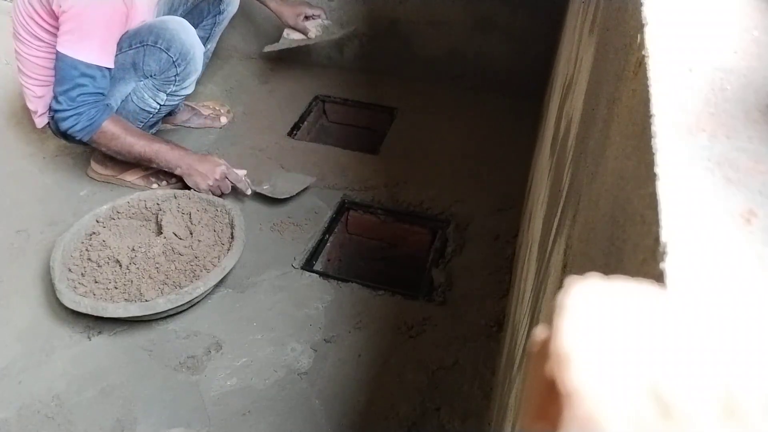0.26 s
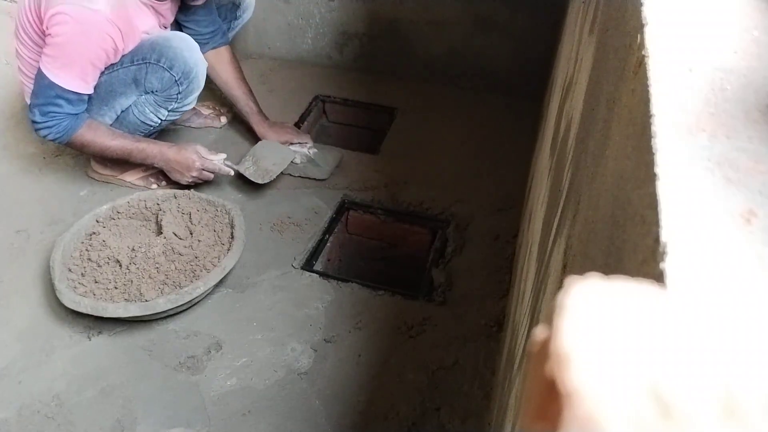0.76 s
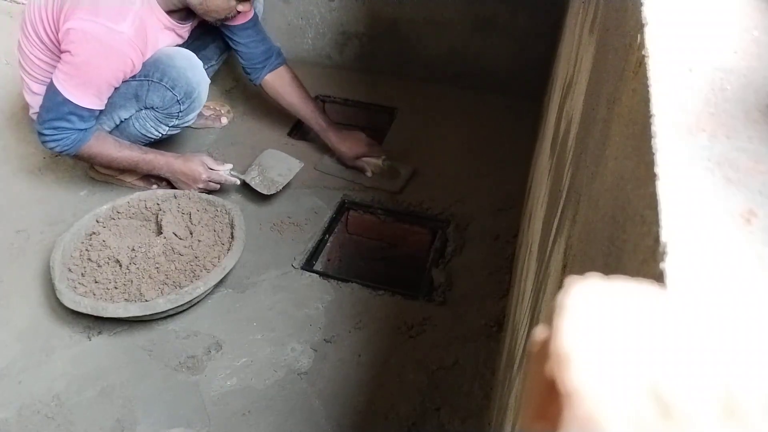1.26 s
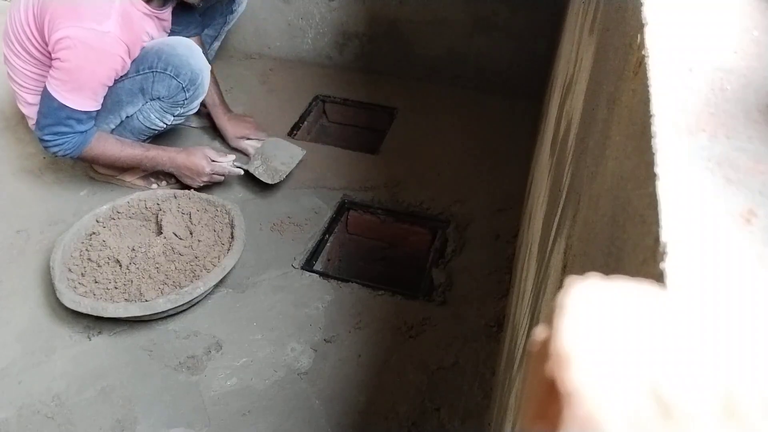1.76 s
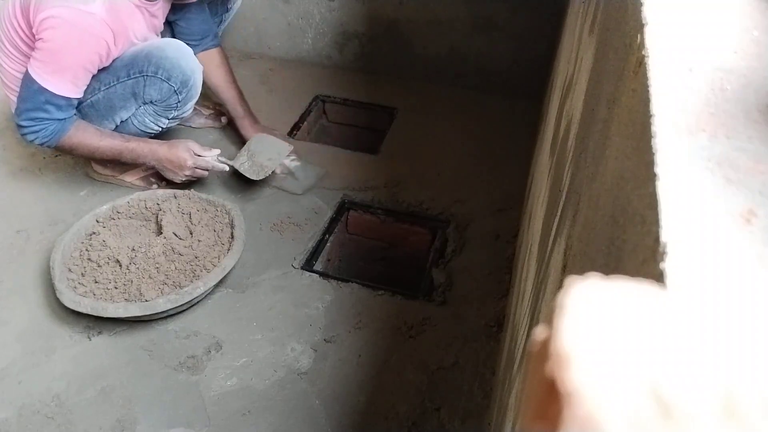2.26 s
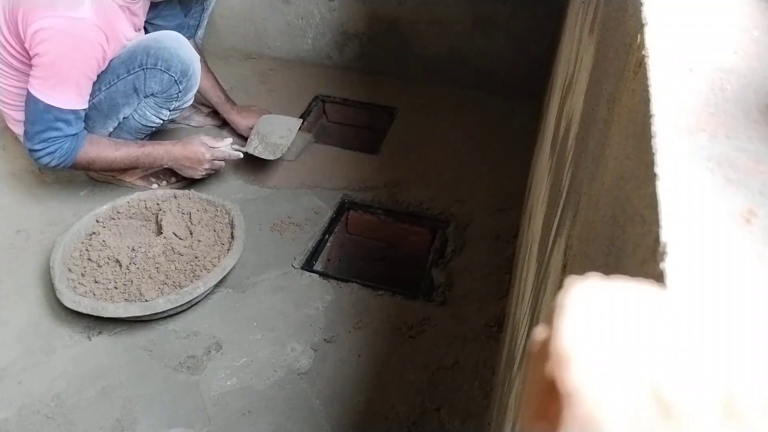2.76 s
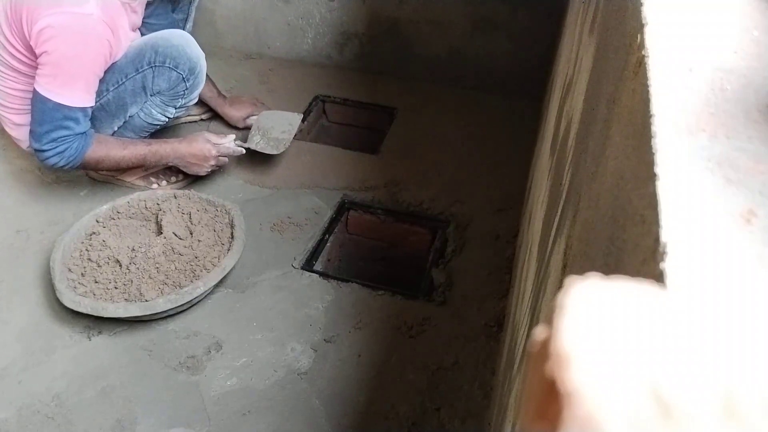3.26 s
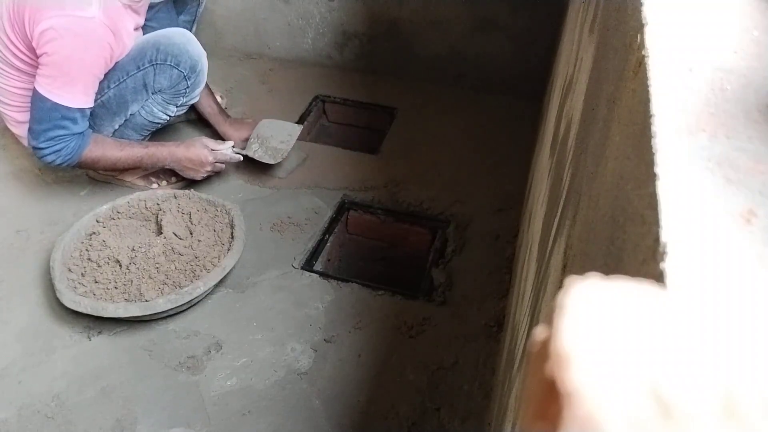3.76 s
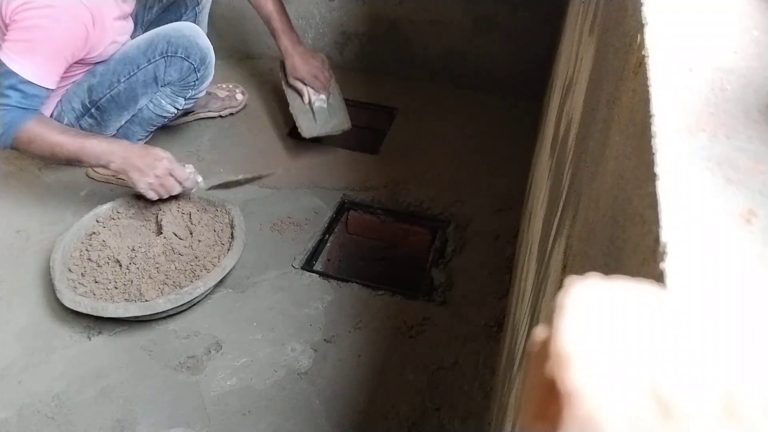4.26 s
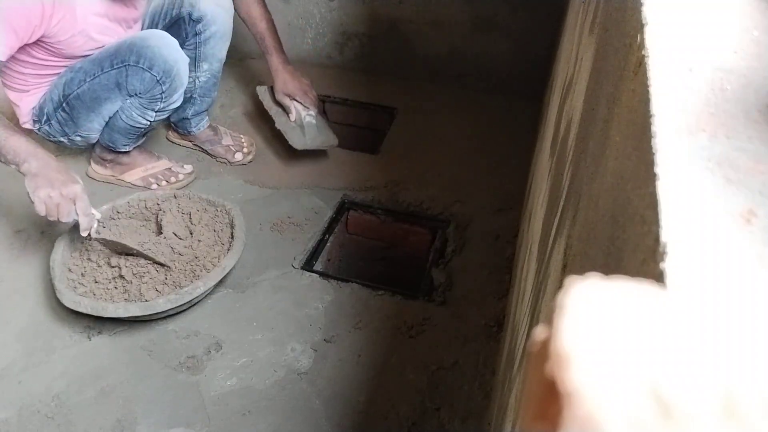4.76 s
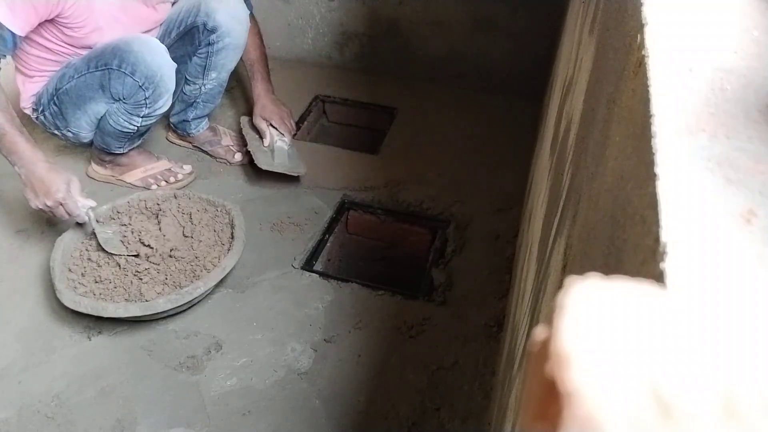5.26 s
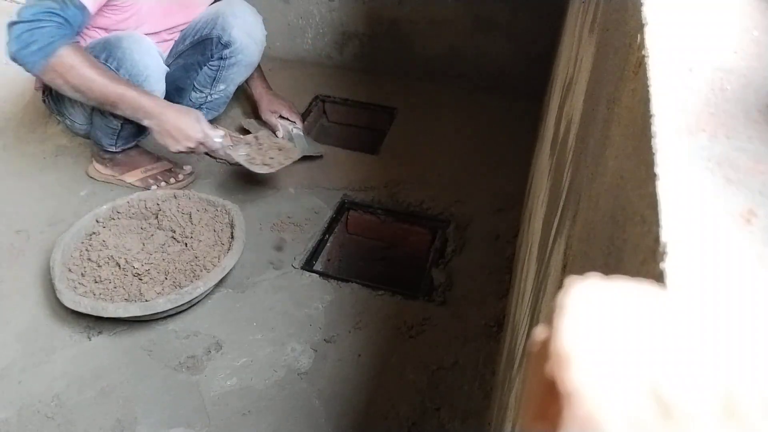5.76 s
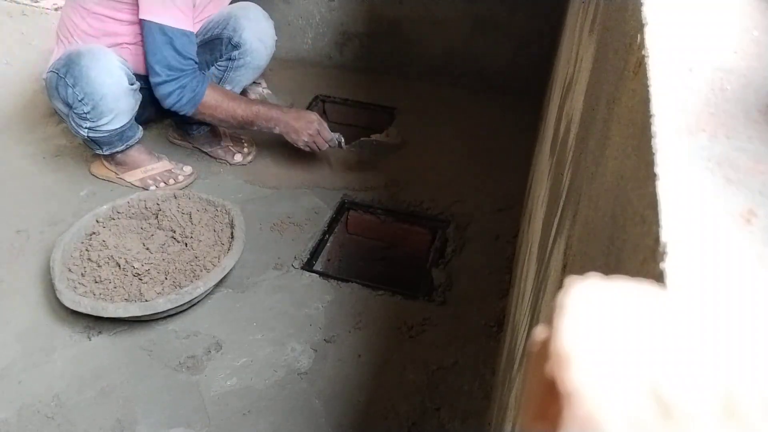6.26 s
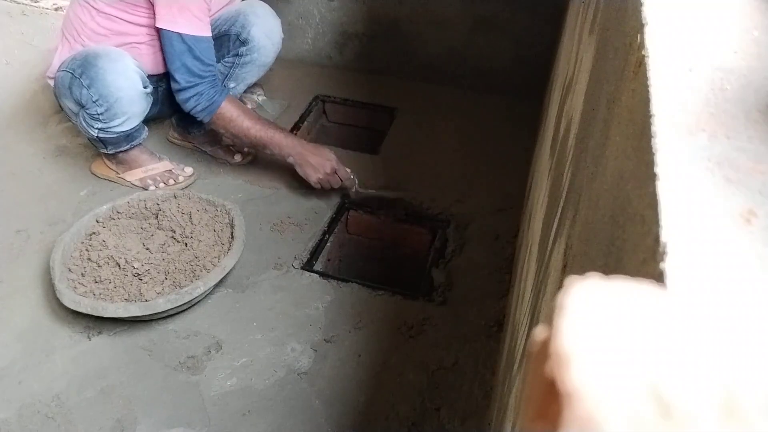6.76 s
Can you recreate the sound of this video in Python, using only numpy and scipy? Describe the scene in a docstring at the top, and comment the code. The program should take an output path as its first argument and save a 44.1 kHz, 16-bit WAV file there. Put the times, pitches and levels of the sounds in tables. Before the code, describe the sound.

Sandy rubbing and hissing strokes over mortar, with small metallic tings, give way to slow ringing hammer strikes reverberating between hard walls.

```python
"""In a bare concrete room a mason smooths wet mortar with a hand float and a steel trowel.
Enveloped noise and sand-grain impulses make each stroke rub, grind and hiss; stones make the trowel sing.
From half way on, heavy, even hammer blows fall out of sight, probably on a chisel in masonry:
coloured echoes clang, thud and ring on between hard walls. Soft bumps are narrow bands of noise,
and a low site rumble of shaped noise lies under it all."""
import sys
import numpy as np
from scipy import signal
from scipy.fft import rfft, irfft, next_fast_len
from scipy.io import wavfile
from scipy.ndimage import uniform_filter1d, map_coordinates

SR = 44100
rng = np.random.default_rng(int(sys.argv[2]) if len(sys.argv) > 2 else 0)


def pcm_store(signal):
    """Save signal as 16-bit PCM."""
    levels = np.round(np.clip(np.atleast_2d(signal), -1, 1) * 32767)
    wavfile.write(sys.argv[1], SR, levels.astype(np.int16).T)


N = 309141  # length in samples, about 7 s


def amp(db):
    """Turn decibels into an amplitude factor."""
    return 10 ** (np.asarray(db) / 20)


def unit(x):
    """Scale to rms 1."""
    return x / np.sqrt(np.mean(x ** 2) + 1e-20)


def along(points, hz):
    """Read a (frequency, value) curve on a log frequency axis."""
    f, v = np.transpose(points)
    return np.interp(np.log(hz + 1), np.log(f + 1), v)


def wobble(rate):
    """A smooth random curve with rate random knots a second."""
    knots = rng.standard_normal(int(N * rate / SR) + 4)
    return map_coordinates(knots, [np.arange(N) * rate / SR])


def add(track, s, sound):
    """Mix a stereo sound into the track at time s."""
    part = track[:, round(s * SR):][:, :sound.shape[1]]
    part += sound[:, :part.shape[1]]


# how alike left and right are: (frequency [Hz], likeness [0-1])
ALIKE = [(100, .95), (250, .87), (500, .73), (1100, .66), (2000, .46), (4000, .33), (9000, .12)]
# phase by which the left leads, negative where the right leads: (frequency [Hz], lead [rad])
LEAD = [(60, 0), (130, -.1), (250, -.3), (500, -1), (1000, -2.4), (1450, -2.5), (2000, -.6), (4000, -.2),
        (7000, -2.5), (15000, -3)]


def diffuse_stereo(pair, colour_db, pan):
    """Two unrelated signals become one coloured, partly shared left-right field; the mid has rms 1."""
    n = pair.shape[1]
    m = next_fast_len(n)
    hz = np.fft.rfftfreq(m, 1 / SR)
    a, b = rfft(pair, m) * amp(colour_db(hz))
    alike = np.clip(along(ALIKE, hz), 0, .99)
    lean = amp(along(pan, hz) / 2)  # half the level difference goes to each side
    shared = alike * np.exp(-1j * along(LEAD, hz))
    own = np.sqrt(1 - alike ** 2)
    left = a * lean
    right = (shared * a + own * b) / lean
    mid_gain = np.hypot(abs(lean + shared / lean), own / lean)  # keeps the mid's colour as asked
    out = irfft(np.array([left, right]) / mid_gain, m)[:, :n]
    return out / out.mean(0).std()


def lift(hz, centre_hz, width_hz, db):
    """A resonance as a bump in dB, half as high at width_hz from its centre."""
    return db / (1 + ((hz - centre_hz) / width_hz) ** 2)


def gliding(note, width_hz):
    """A resonance that follows (time [s], centre [Hz], lift [dB]) rows, as a function of Hz and s."""
    s, centre, db = np.transpose(note)
    return lambda hz, t: lift(hz, np.interp(t, s, centre), width_hz, np.interp(t, s, db))


def narrow(n, centre_hz, width_hz, pan):
    """A resonance heard through the room: narrow stereo noise, 6 dB down at width_hz from its centre."""
    def colour_db(hz):
        return -20 * np.log10(1 + ((hz - centre_hz) / width_hz) ** 2)
    return diffuse_stereo(rng.standard_normal((2, n)), colour_db, pan)


def grains(n, rate, spread_db):
    """Tiny random impulses of uneven size, rate a second on average, drawn apart for each channel."""
    hits = rng.random((2, n)) < rate / SR
    size = rng.standard_normal((2, n)) * amp(spread_db * rng.standard_normal((2, n)))
    return unit(hits * size)


def flat(hz, t):
    """No steered resonance: 0 dB everywhere."""
    return 0


def speed(start, length, fastest):
    """One stroke: the blade gathers speed and slows to a stop, 0-1."""
    peak = np.clip(fastest, .05, .97)
    turns = start + length * np.array([0, peak, 1])
    return np.sin(np.pi / 2 * np.interp(np.arange(N) / SR, turns, [0, 1, 0]))


LINGER_SHARE = 0.69  # share of a stroke's energy that comes by way of the walls


def loudness(speeds, levels_db, grows, t60):
    """Strokes sound with a power of the blade's speed and linger in the room; one gain per sample."""
    energy = sum((amp(db) * v ** grows) ** 2 for v, db in zip(speeds, levels_db))
    keep = amp(-120 / (t60 * SR))  # energy kept per sample: 60 dB lost in t60
    lingering = signal.lfilter([1 - keep], [1, -keep], energy)
    return np.sqrt((1 - LINGER_SHARE) * energy + LINGER_SHARE * lingering)


def shifting(x, gain_db, depth_db):
    """Changing contact moves the blade's resonances about; gain_db(Hz, s) adds a steered one."""
    hz, t, z = signal.stft(x, SR, nperseg=1024)
    field = rng.standard_normal(z.shape[1:])
    for _ in range(2):
        field = uniform_filter1d(field, size=4, axis=0)
        field = uniform_filter1d(field, size=12, axis=1)
    fade = 1 / (1 + (hz[:, None] / 7000) ** 2)  # high up the resonances overlap and even out
    z = z * amp(depth_db * fade * unit(field) + gain_db(hz[:, None], t))
    return unit(signal.istft(z, SR, nperseg=1024)[1][:, :N])


# left-right balance of the mason's work: (frequency [Hz], left over right [dB])
MASON_PAN = [(150, -2), (380, -6.5), (1200, 3.5), (2400, 1), (4400, -7), (8000, -3), (15000, -5)]


def sand(spectrum, rate, blur, depth_db, gain_db=flat):
    """Grains catching under a blade, partly blurred into a rush by the walls."""
    catches = grains(N, rate, spread_db=1.5) + blur * rng.standard_normal((2, N))
    moving = shifting(catches, gain_db, depth_db)
    return diffuse_stereo(moving, lambda hz: along(spectrum, hz), MASON_PAN)


# colours of the three parts of a stroke: (frequency [Hz], relative density [dB per Hz])
RUB = [(150, 4.5), (330, -1.5), (520, -5.5), (800, -1.5), (1150, -1.5), (1500, -4), (2200, -4.5),
       (4000, -54)]
GRIND = [(800, -18), (1400, -7.5), (2000, -0.5), (2800, 1), (4000, -2.5), (5000, -5.5), (6500, -14),
         (9000, -19.5), (16000, -38)]
HISS = [(3000, -20), (5500, 4), (7500, -0.5), (10000, 1), (13000, 0), (16000, -1.5)]
RUB_GROWS, GRIND_GROWS, HISS_GROWS = 0.58, 0.85, 0.82  # power of blade speed that each amplitude follows
RUB_T60_S, GRIND_T60_S, HISS_T60_S = 1.7, 1.1, 0.55  # how long each part lingers in the room
TREMBLE_DB, TREMBLE_PER_S = 0.83, 35  # unsteady hand: spread of the random knots, knots a second
# grinding brightens with speed: a resonance that rises from its slow pitch
GRIND_SLOW_HZ, GRIND_RISE_HZ, GRIND_WIDTH_HZ, GRIND_LIFT_DB = 2600, 1400, 1400, 1


def blade(strokes, hollow=flat, edge=flat):
    """A blade on mortar rubs, grinds sand and hisses wetly; the hand's pressure trembles."""
    speeds = [speed(*row[:3]) for row in strokes]
    rub_db, grind_db, hiss_db = np.transpose(strokes)[3:6]
    total_speed = sum(speeds)

    def brighten(hz, t):
        centre_hz = GRIND_SLOW_HZ + GRIND_RISE_HZ * np.interp(t, np.arange(N) / SR, total_speed)
        return lift(hz, centre_hz, GRIND_WIDTH_HZ, GRIND_LIFT_DB)

    rub = sand(RUB, rate=900, blur=1.1, depth_db=0.5, gain_db=hollow)
    rub *= loudness(speeds, rub_db, RUB_GROWS, RUB_T60_S)
    grind = sand(GRIND, rate=1800, blur=1.76, depth_db=1.8, gain_db=brighten)
    grind *= loudness(speeds, grind_db, GRIND_GROWS, GRIND_T60_S)
    hiss = sand(HISS, rate=6000, blur=1.1, depth_db=4.0, gain_db=edge)
    hiss *= loudness(speeds, hiss_db, HISS_GROWS, HISS_T60_S)
    return amp(TREMBLE_DB * wobble(TREMBLE_PER_S)) * (rub + grind + hiss)


# the trowel scrapes and scoops; levels are before the room smears them:
# (time [s], length [s], share of the length at which it is fastest [0-1, held to .05-.97],
#  rubbing [dB], grinding [dB], wet hiss [dB], lift of the edge's sizzle [dB])
SCRAPES = [(-.09, 0.15, 0.43, -47, -40, -46, -8), (0.131, .21, 0.87, -48.5, -40, -41.5, 5.5),
           (4.82, 0.23, .2, -64, -57, -58, 6), (4.92, 0.31, 0.98, -68, -49.5, -50.5, 4),
           (6.544, 0.083, .28, -57, -46.5, -53.5, -3)]
EDGE_HZ, EDGE_WIDTH_HZ = 13700, 2200  # the thin edge sizzles high


def trowel():
    """The thin steel edge shapes the hiss of its scrapes with a high resonance."""
    sizzle = [(s, EDGE_HZ, lift_db) for s, *_, lift_db in SCRAPES]
    return blade(SCRAPES, edge=gliding(sizzle, EDGE_WIDTH_HZ))


# colour of the site rumble: (frequency [Hz], relative density [dB per Hz])
SITE = [(20, -33), (32, -18), (48, 1.5), (65, -5), (100, 0.5), (160, -11.5), (250, -17), (480, -24),
        (660, -23), (780, -18), (920, -26), (1700, -24), (4000, -36.5), (8000, -54), (16000, -54)]
# settled level, how far below it the rumble starts, and the time constant of its growth
RUMBLE_DB, RUMBLE_GROWTH_DB, RUMBLE_GROWTH_S = -43, 3.5, .95


def site():
    """Distant machines and traffic come in as an uneven rumble that grows a little, then holds."""
    pan = [(60, -1.1), (1200, 1), (6000, -2)]  # (frequency [Hz], left over right [dB])
    noise = diffuse_stereo(rng.standard_normal((2, N)), lambda hz: along(SITE, hz), pan)
    level_db = RUMBLE_DB - RUMBLE_GROWTH_DB * np.exp(-np.arange(N) / SR / RUMBLE_GROWTH_S)
    return amp(level_db + 1.45 * wobble(3.86)) * noise


# stones catch the edge of the trowel and make it sing briefly: (time [s], level [dB])
TINGS = [(.268, -43), (5.13, -49.5)]
# modes of the trowel blade: (frequency [Hz], relative level [dB], time to fall 60 dB [s])
TROWEL_MODES = [(2750, -9, .35), (4180, 0, 0.43), (4400, -3, 0.2), (6160, -19, .2)]


def tings():
    """A short scrape feeds the thin blade's narrow modes, which swell quickly and die away."""
    out, t = np.zeros((2, N)), np.arange(SR // 2) / SR
    swell = 1 - np.exp(-t / 0.0055)
    for s, db in TINGS:
        for mode_hz, mode_db, t60 in TROWEL_MODES:
            fall = amp(db + mode_db - 60 * t / t60)
            add(out, s, fall * swell * narrow(len(t), mode_hz, 80, MASON_PAN))
    return out


# the float sweeps to and fro; levels are before the room smears them:
# (time [s], length [s], share of the length at which it is fastest [0-1],
#  rubbing [dB], grinding [dB], wet hiss [dB], hollow note [Hz], lift of the note [dB])
SWEEPS = [(.44, 0.44, 0.41, -63, -57, -65, 900, -3), (0.865, 0.45, 0.73, -47, -46.5, -54, 850, 0.5),
          (1.355, 0.52, 0.4, -42.5, -41, -48.5, 960, 1), (1.896, 0.41, 0.24, -45, -54.5, -62.5, 1000, 0.5),
          (2.176, 0.44, 0.45, -46, -39.5, -49, 1080, 7.5), (2.643, .25, 0.61, -49.5, -39, -50.5, 1260, 10),
          (2.961, 0.21, 0.23, -55, -41, -53, 1340, 15.5), (3.26, 0.38, 0.6, -42.5, -37, -48, 1240, 6),
          (3.705, 0.3, 0.46, -40, -41, -52, 1210, 0)]
NOTE_WIDTH_HZ = 190  # the hollow under the float


def hand_float():
    """The hollow under the float has a note that glides from one sweep to the next."""
    note = [(s + length / 2, note_hz, lift_db) for s, length, *_, note_hz, lift_db in SWEEPS]
    return blade(SWEEPS, hollow=gliding(note, NOTE_WIDTH_HZ))


# soft bumps of the tools and shifting feet:
# (time [s], level [dB, before the common 8.5 dB boost and the envelope], centre [Hz])
BUMPS = [(1.48, -56, 406), (1.58, -57, 193), (1.85, -55, 285), (2.3, -60, 250), (2.941, -46.5, 262),
         (3.95, -49.5, 305), (4.219, -49.5, 364), (4.761, -43, 284), (5.02, -49.5, 270),
         (5.761, -51.5, 290)]


def bumps():
    """Dull pushes on the floor wake a narrow band of the room's low modes."""
    out, t = np.zeros((2, N)), np.arange(SR) / SR
    swell = 1 - np.exp(-t / 0.042)
    for s, db, centre_hz in BUMPS:
        fall = amp(db + 8.5 - 60 * t / 0.86)
        add(out, s, fall * swell * narrow(len(t), centre_hz, 29, MASON_PAN))
    return out


# how long the hard walls ring: (frequency [Hz], time to fall 60 dB [s])
HALL = [(80, 0.89), (200, 2.32), (550, 1.57), (1400, 1.46), (2200, 1.37), (4000, 1.105), (7000, 0.82),
        (14000, 0.4)]


def hall_decay(x, hold):
    """Reflections pile up, the bass most slowly; after hold seconds each frequency dies at its own speed."""
    hz, t, z = signal.stft(x, SR, nperseg=256)
    age = np.maximum(t - hold, 0)
    build = 1 - np.exp(-(t + 0.006) * (hz[:, None] + 40) / 5)
    fall = amp(-60 * age / along(HALL, hz)[:, None])
    return signal.istft(z * build * fall, SR, nperseg=256)[1][:, :x.shape[1]]


# hammer blows, each landing a little differently; the level is before build-up and decay:
# (time [s], level [dB], thud [dB], body [dB], knock [dB], edge [dB], ping [dB], crack [dB],
#  wait before the tail starts to fall [s])
BLOWS = [(3.519, -21, -.5, -2.5, -2.5, -5.5, 0, -6.5, 0.07), (4.376, -18, 3.5, 0, -11, -1.5, -.5, 6, 0.046),
         (5.199, -16.5, -4, 0.5, -1, -2.5, .5, -2.5, 0.086), (6.047, -16, -1.5, -1.5, -2, 1, -2, 2, 0.083),
         (6.960, -17, -3.5, -4, -10, -4, 0.5, -0.5, 0.076)]
# centres of thud, body, knock, clang, edge, ping and crack: (frequency [Hz])
BLOW_HZ = [170, 650, 1150, 1750, 2800, 5000, 9000]
# colour that all blows share: (frequency [Hz], relative density [dB per Hz])
IMPACT = [(40, -32), (75, -11), (165, -8), (380, -13), (470, -13), (620, -13), (850, -10), (1250, -4.5),
          (1700, -5.5), (2100, -2), (3000, -9), (4000, -20), (5400, -24.5), (7400, -34), (9000, -33),
          (15500, -44)]
# resonances that the blows wake, the room's below 800 Hz and the steel's above:
# (centre [Hz], half-width [Hz], lift [dB])
RING = [(97, 28, 7), (164.5, 9.6, 8), (219, 8.2, 3), (279, 56, 4), (610, 70, 5), (781, 13, 6),
        (1082, 17, 3), (1287, 22, 1.5), (1680, 11, 3.5), (1794, 30, 3), (2010, 20, 6.5), (2210, 9.9, 3.5),
        (2290, 17, 4), (2510, 10, 4), (2660, 3.3, 0), (3030, 38, 3)]
# left-right balance of the hammer: (frequency [Hz], left over right [dB])
HAMMER_PAN = [(100, -1), (220, 2.5), (600, 1), (1200, 5), (2100, 5.2), (4000, -1.2), (9000, -3)]


def hammer():
    """Each blow comes by way of the walls: a first crack, then separate slaps thicken into a long tail."""
    out, t = np.zeros((2, N)), np.arange(SR * 3 // 2) / SR
    early = 0.42 * np.exp(-t / 0.23)  # share of the energy in separate echoes
    attack = 1 - np.exp(-t / 0.0025)
    for s, db, thud_db, body_db, knock_db, edge_db, ping_db, crack_db, hold in BLOWS:
        slaps = np.sqrt(early) * grains(len(t), rate=1800, spread_db=3.0)
        wash = np.sqrt(1 - early) * rng.standard_normal((2, len(t)))
        echoes = slaps + wash
        echoes[:, SR // 800] += 9  # the shortest path
        # the clang is the 0 dB reference of each blow
        contact = list(zip(BLOW_HZ, [thud_db, body_db, knock_db, 0, edge_db, ping_db, crack_db]))

        def colour_db(hz):
            ring_db = sum(lift(hz, *mode) for mode in RING)
            return along(IMPACT, hz) + along(contact, hz) + ring_db

        tail = hall_decay(diffuse_stereo(echoes, colour_db, HAMMER_PAN), hold)
        # the nearest walls pass on the steel's first clang before the room fills
        clang = narrow(len(t), centre_hz=1900, width_hz=96, pan=HAMMER_PAN)
        clang *= amp(-2.0 - 60 * t / 0.2)
        add(out, s, amp(db) * (tail + clang) * attack)
    return out


def scene():
    """Mix all the sources."""
    return trowel() + site() + tings() + hand_float() + bumps() + hammer()


TOP_HZ = 15800  # band limit


def record(dry):
    """The highest peaks are rounded off and nothing is kept from the band limit up."""
    held = dry / (1 + np.abs(dry) ** 6) ** (1 / 6)
    m = next_fast_len(N + SR // 2)
    passed = np.fft.rfftfreq(m, 1 / SR) < TOP_HZ
    return irfft(rfft(held, m) * passed, m)[:, :N]


dry = scene()
out = record(dry)
pcm_store(out)
```